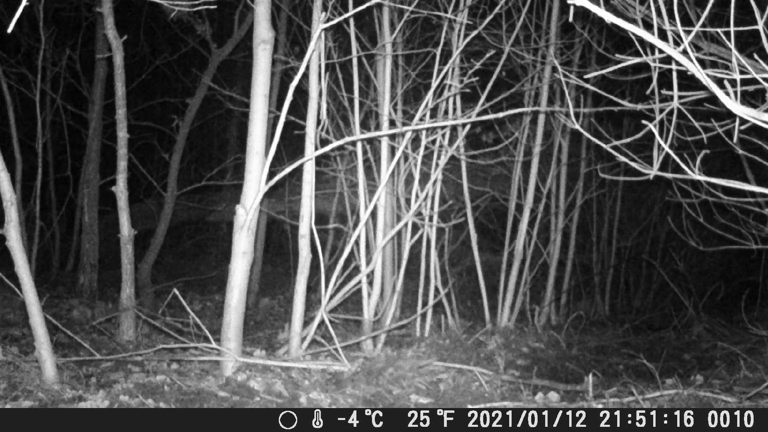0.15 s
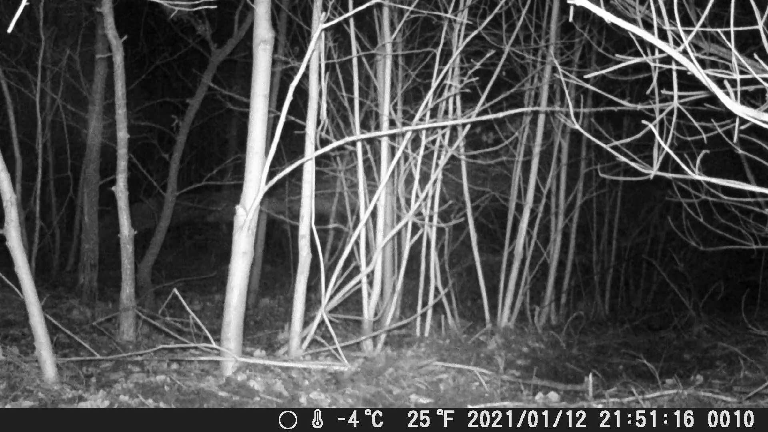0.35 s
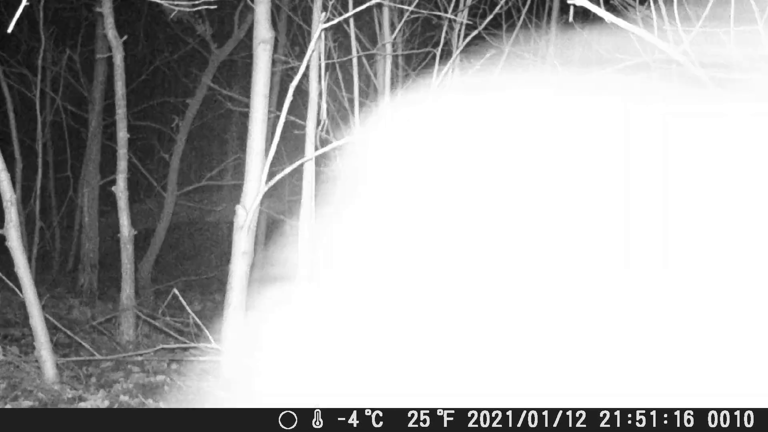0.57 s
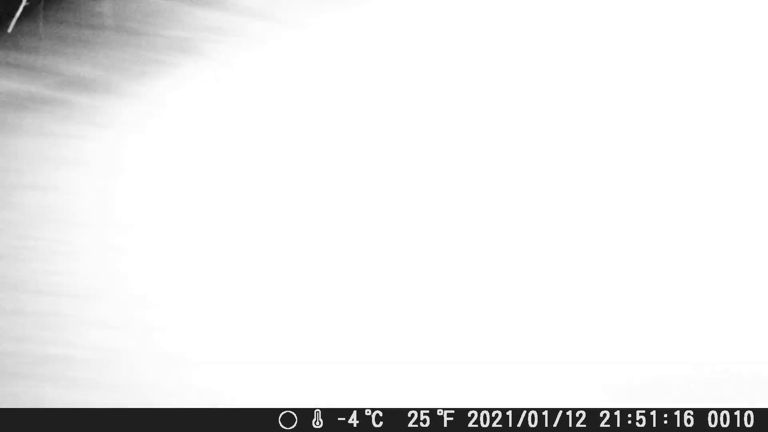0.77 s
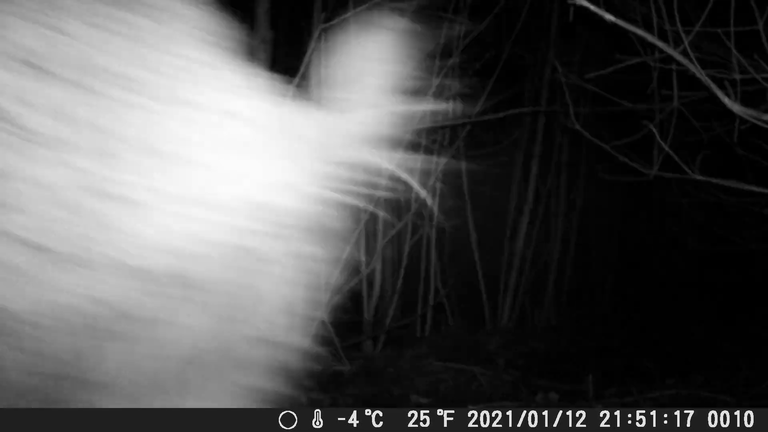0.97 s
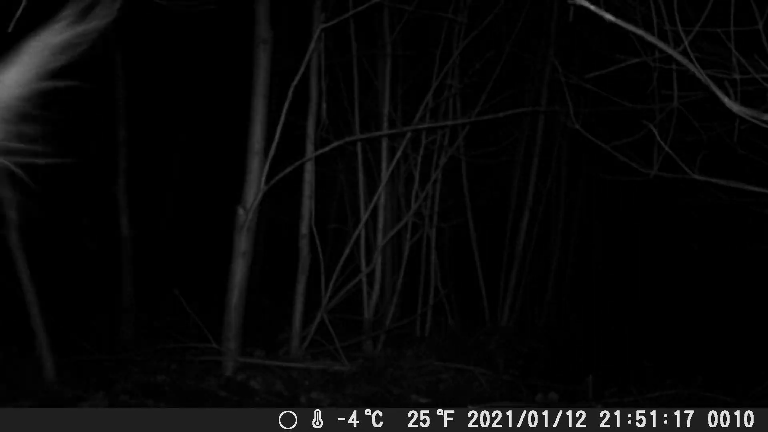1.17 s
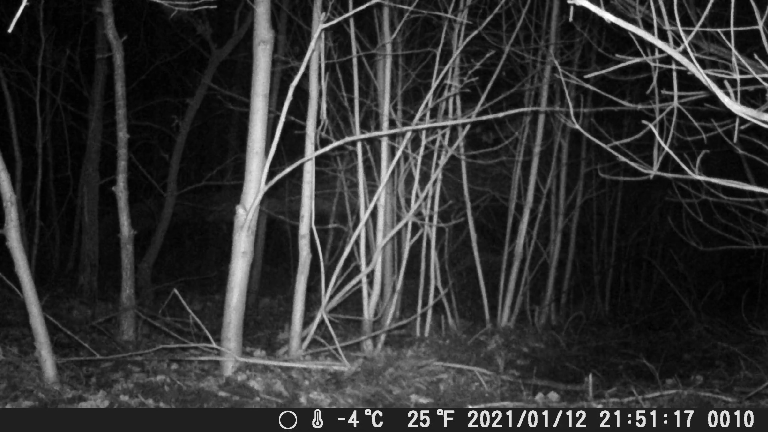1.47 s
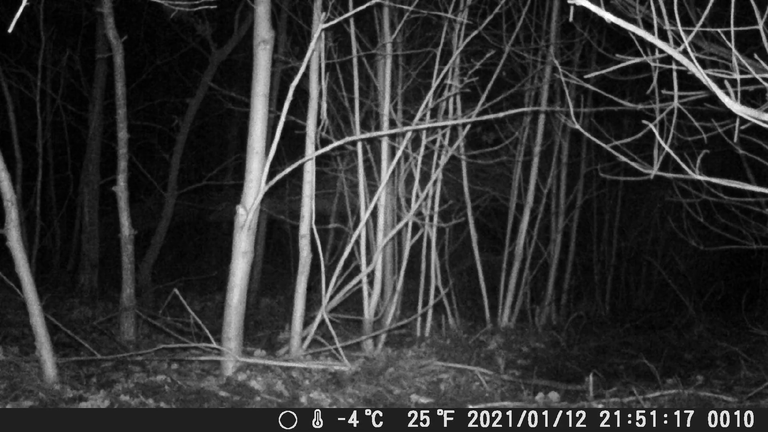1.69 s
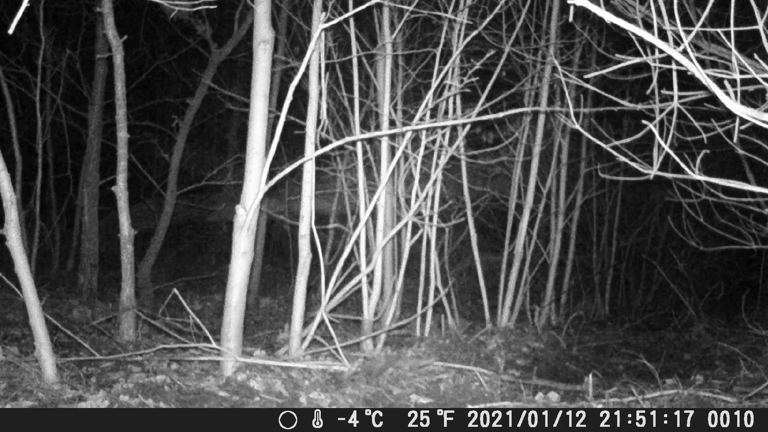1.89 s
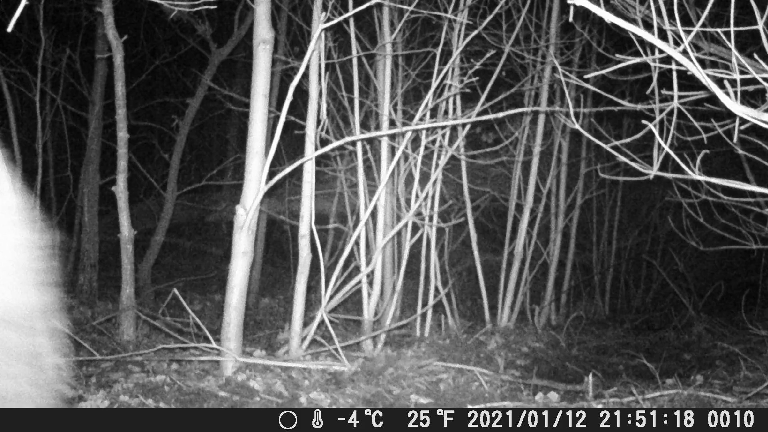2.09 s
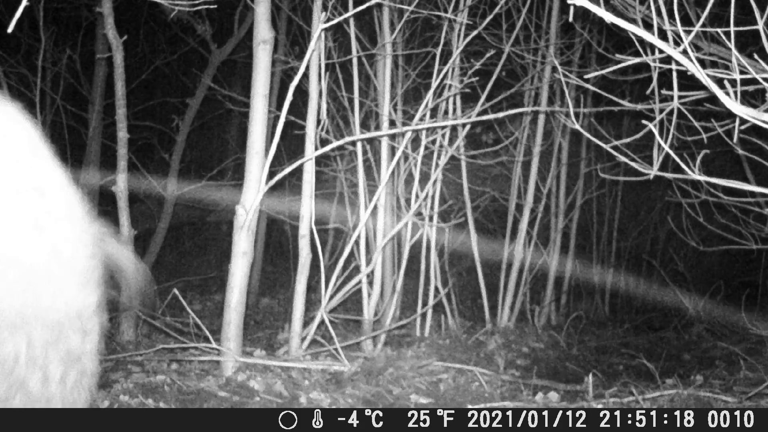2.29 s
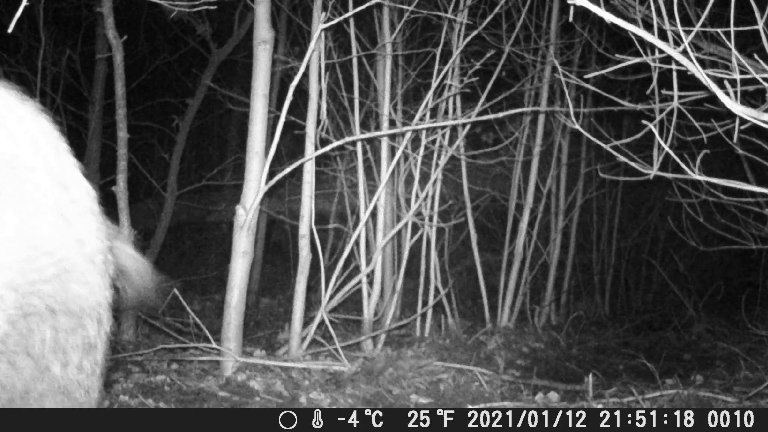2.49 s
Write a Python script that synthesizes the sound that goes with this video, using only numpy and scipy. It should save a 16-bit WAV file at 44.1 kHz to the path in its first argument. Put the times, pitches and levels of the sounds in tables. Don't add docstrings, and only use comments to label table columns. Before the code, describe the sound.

Short throaty boar grunt, then a puffing snort, amid hooves crunching frosty leaves and snapping twigs

```python
import sys
import numpy as np
from scipy import signal
from scipy.fft import rfft, irfft
from scipy.io import wavfile
from scipy.ndimage import uniform_filter1d

SR = 44100
rng = np.random.default_rng(int(sys.argv[2]) if len(sys.argv) > 2 else 0)


def nominal_scale(level):
    x = np.asarray(level, float) / 20
    return 10 ** x


def master(y):
    cut = np.clip(np.atleast_2d(y).T, -1, 1)
    pcm = np.round(cut * 32767)
    wavfile.write(sys.argv[1], SR, pcm.astype(np.int16))


N = 116865
TIME_S = np.arange(N) / SR


def rms_one(x):
    return x / np.sqrt(np.mean(x ** 2) + 1e-20)


def in_time(rows):
    s, *columns = np.transpose(rows)
    return [np.interp(TIME_S, s, c) for c in columns]


def drift(rate_hz):
    r = np.exp(-2 * np.pi * rate_hz / SR)
    noise = rng.standard_normal(N + SR)
    return rms_one(signal.lfilter([1], [1, -2 * r, r * r], noise)[SR:])


def colour(x, spectrum):
    hz = np.arange(1, N // 2 + 2) * SR / N
    at_hz, db = np.transpose(spectrum)
    at_hz = np.r_[at_hz[0] / 4, at_hz, at_hz[-1] * 1.1]
    db = np.r_[db[0] - 30, db, db[-1] - 40]
    gain = nominal_scale(np.interp(np.log(hz), np.log(at_hz), db))
    return rms_one(irfft(rfft(x) * gain, N))


def band(x, order, low_hz, high_hz):
    return signal.sosfilt(signal.butter(order, [low_hz, high_hz], "band", fs=SR, output="sos"), x)


def lowpass(x, order, hz):
    return signal.sosfilt(signal.butter(order, hz, fs=SR, output="sos"), x)


def resonate(x, hz, width_hz):
    r, w = np.exp(-np.pi * width_hz / SR), 2 * np.pi * hz / SR
    return signal.lfilter([0, np.sin(w)], [1, -2 * r * np.cos(w), r * r], x + 1e-18)


def peak(x, hz, width_hz):
    r, w = np.exp(-np.pi * width_hz / SR), 2 * np.pi * hz / SR
    return signal.lfilter([(1 - r * r) / 2, 0, (r * r - 1) / 2], [1, -2 * r * np.cos(w), r * r], x + 1e-18)


def grains(per_s, spread_db):
    sizes = nominal_scale(spread_db * np.minimum(rng.exponential(1, N), 4)) * rng.choice([-1, 1], N)
    clicks = sizes * (rng.random(N) < per_s / SR)
    return rms_one(clicks) + 0.45 * rng.standard_normal(N)


# time in seconds, fold pulse rate in Hz, level in dB, mouth opening 0-1.
GRUNT = [
    (1.698, 60.93, -31, 0),
    (1.715, 60.76, -48, 0.18),
    (1.721, 62.8, -23, 0),
    (1.762, 68.64, -19.5, 0.18),
    (1.78, 72.35, -26.5, 0.37),
    (1.811, 94.36, -29.5, 0.8),
    (1.817, 73.18, -25, 1),
    (1.888, 71.8, -25, 0.83),
    (1.901, 66, -34, 0.6),
]


def fold_cycles():
    rate_hz = in_time(GRUNT)[0]
    on = (TIME_S > GRUNT[0][0]) & (TIME_S < GRUNT[-1][0])
    return 0.5 + np.cumsum(rate_hz * on) / SR, on


# pitch in Hz, width in Hz, level in dB with mouth shut, half open, open.
THROAT = [(94.6, 98, -6, -5.5, -5), (186, 90, -8, -4, -7), (302, 132, -0.5, 2.5, -8),
          (431, 74, -14.5, -10.5, -12), (568, 130, -22, 7.5, -12), (679, 110, -4.5, -56, -8),
          (886, 107, -27, -46, 5.5), (998, 103, -22.5, 6.5, -27), (1121, 107, -15, -49, 1.5),
          (1744, 193, -34, -8.5, -8.5), (2333, 340, -46.5, -11.5, -3.5), (2470, 68, -45, -15, -15.5),
          (3750, 330, -46, -50, -27)]
# pitch in Hz, width in Hz.
NOTCHES = [(1400, 190), (2010, 74)]
# time in seconds, lift in dB.
SNOUT = [(1.78, -2.5), (1.797, 0.5), (1.81, 4), (1.822, -6.5), (1.846, 0.5), (1.86, 0), (1.872, 3),
         (1.886, -5.5), (1.9, 12)]


def grunt():
    jitter_cycles, shimmer_db, rough, scatter_s = 0.012, 1.4, 0.28, 0.0006
    rate_hz, level_db, mouth = in_time(GRUNT)
    push_db, = in_time(SNOUT)
    cycles, on = fold_cycles()
    at = np.flatnonzero(np.diff(np.floor(cycles)))
    timing = rng.standard_normal(len(at))
    at = at + (timing * jitter_cycles * SR / rate_hz[at]).astype(int)
    puff = rough * 0.2 * rng.standard_normal(N) * np.exp(-2.6 * (cycles % 1))
    voice = np.zeros(N)
    for hz, width_hz, *mouth_db in THROAT:
        late = (scatter_s * rng.standard_normal(len(at)) * SR).astype(int)
        drive = puff.copy()
        drive[at + late] -= nominal_scale(shimmer_db * rng.standard_normal(len(at)))
        drive_db = level_db + (hz > 1500) * push_db + np.interp(mouth, [0, 0.5, 1], mouth_db)
        drive = drive * on * nominal_scale(drive_db)
        voice += peak(resonate(drive, hz, width_hz), hz, width_hz)
    for hz, width_hz in NOTCHES:
        voice = voice - 0.8 * peak(voice, hz, width_hz)
    shut = 1 / (1 + np.exp(np.clip((TIME_S - GRUNT[-1][0]) / 0.0019, -50, 50)))
    return nominal_scale(9.5) * voice * shut


# time in seconds, level in dB.
NOSE = [
    (1.69, -75.5),
    (1.712, -44.5),
    (1.74, -46),
    (1.762, -61),
    (1.81, -46.5),
    (1.832, -66.5),
    (1.858, -56.5),
    (1.895, -75.5),
]


def nose_breath():
    rasp_db, pulsing_db = -7.5, 2
    nose_db, = in_time(NOSE)
    mouth = in_time(GRUNT)[2]
    cycles, _ = fold_cycles()
    nose = rms_one(band(grains(2200, spread_db=1.3), 3, 5600, 7900))
    rasp = rms_one(band(grains(3400, spread_db=1.5), 2, 1700, 5400))
    level = nominal_scale(nose_db - pulsing_db * mouth * (cycles % 1))
    return (np.abs(TIME_S - 1.8) < 0.12) * level * (nose + nominal_scale(rasp_db) * rasp)


# time in seconds, level in dB.
SNORT = [
    (1.965, -59),
    (1.99, -39.5),
    (2.018, -35),
    (2.045, -40),
    (2.075, -44),
    (2.105, -61.5),
    (2.125, -56.5),
    (2.2, -57.5),
]
# frequency in Hz, density in dB per Hz.
SNORT_COLOUR = [(76, -45.5), (130, -6.5), (362, -6), (409, -3.5), (524, -9.5), (1140, -7), (3900, -28.5),
                (4800, -36), (6870, -25), (8800, -40.5), (11400, -78), (19400, -120)]


def snort():
    start, end = (SNORT[0][0] - 0.01, -90), (SNORT[-1][0] + 0.014, -90)
    db, = in_time([start] + list(SNORT) + [end])
    return nominal_scale(db + 1.5 * drift(70)) * colour(grains(3500, spread_db=2.5), SNORT_COLOUR)


# start in seconds, length in seconds, level in
# dB, first Hz, last Hz.
WHISTLES = [(0.584, 0.0704, -61, 1343, 1600), (1.11, 0.048, -64, 1460, 2000),
            (1.135, 0.043, -57.5, 949, 602), (1.165, .03, -67, 1910, 1320), (1.63, .05, -70, 488, 417),
            (1.697, .025, -40.5, 232, 293), (1.706, 0.051, -52.5, 1950, 1880),
            (1.765, 0.051, -40, 965, 1027), (1.815, 0.05, -64.5, 4400, 4060),
            (1.84, 0.073, -58, 3970, 3670), (1.843, 0.028, -56.5, 5870, 5880),
            (1.845, 0.014, -33, 912, 870), (1.849, .045, -65, 4980, 4940), (1.878, 0.028, -34, 928, 834),
            (1.885, 0.013, -54, 3850, 3840), (1.99, 0.0443, -54, 807, 1293), (2.0, 0.05, -59.5, 3800, 3782),
            (2.025, 0.032, -57, 2095, 2520), (2.06, 0.031, -52, 2470, 2640), (2.08, .035, -50, 2143, 2310),
            (2.1, 0.054, -52.5, 266.3, 205)]


def whistles():
    out = np.zeros(N)
    for s, length_s, db, first_hz, last_hz in WHISTLES:
        slow = lowpass(rng.standard_normal((2, SR // 8)), 2, 140)[:, 1000:]
        u = np.clip(np.arange(slow.shape[1]) / (length_s * SR), 0, 1)
        turn = 2 * np.pi * np.cumsum(first_hz + (last_hz - first_hz) * u) / SR
        wave = rms_one(slow[0] * np.cos(turn) + slow[1] * np.sin(turn))
        out[int(s * SR):][:len(u)] += nominal_scale(db) * np.sin(np.pi * u ** 0.73) * wave
    return out


# start in seconds, length in seconds, level in dB, brightness in dB,
# share of the length spent swelling.
RUSTLES = [(-.02, 0.032, -47, 0.9, 0.033), (0.02, .11, -51, -1.5, 1), (0.123, 0.086, -55.5, 2.5, 0.61),
           (.231, 0.005, -53, 3.5, 0.032), (0.284, 0.077, -58.5, -1.5, 0.25),
           (0.387, 0.022, -51.5, 2.5, 0.16), (0.431, 0.019, -72.5, 6.5, 0.23), (0.498, 0.15, -59.5, 3.5, 1),
           (0.69, 0.062, -70, 1, 0.72), (0.782, 0.015, -60, 0.7, 0.082), (0.829, 0.081, -60, -1.2, 0.19),
           (1.071, 0.059, -56, 1, 0.95), (1.106, 0.085, -57.5, -6.5, 0.82),
           (1.34, 0.038, -58.5, -1.5, 0.63), (1.403, 0.081, -70, 3.5, 0.23), (1.481, 0.1, -60, 4.5, 1),
           (1.891, 0.059, -55, 4, 1), (2.073, 0.046, -46.5, -1.5, 0.17), (2.126, 0.041, -65, 4, 0.59),
           (2.179, 0.059, -57.5, 3.5, 0.45), (2.272, 0.038, -53, 1, 0.76), (2.332, 0.034, -60, 4, 0.94),
           (2.363, 0.12, -55, -0.45, 0.28), (2.527, 0.019, -52, -1.3, 0.69),
           (2.568, 0.052, -59.5, 0.5, 0.31)]
# frequency in Hz, density in dB per Hz.
LEAVES = [(120, -4), (200, 1.5), (756, -5.5), (1700, -7.5), (2560, -11.5), (3250, -13.5), (4900, -23.5),
          (7160, -14.5), (8800, -30), (11400, -74), (19400, -120)]


def leaves():
    crackles_per_s, fall_s = 900, 0.02
    crackle = colour(grains(crackles_per_s, spread_db=1.75), LEAVES)
    low = lowpass(crackle, 1, 2000)
    dull, bright = np.zeros(N), np.zeros(N)
    for s, length_s, db, tilt_db, swell in RUSTLES:
        rise = np.clip((TIME_S - s) / (max(swell, 0.03) * length_s), 0, 1)
        shape = rise * np.exp(-np.maximum(TIME_S - s - length_s, 0) / fall_s)
        dull += shape * nominal_scale(db - tilt_db)
        bright += shape * nominal_scale(db + 2.3 * tilt_db)
    return nominal_scale(1.2 * drift(70)) * (dull * low + bright * (crackle - low))


# time in seconds, peak in dB, pitch in Hz.
SNAPS = [(0.072, -59, 2220), (0.0978, -52, 1880), (0.197, -48, 1270), (0.2329, -49.5, 1600),
         (0.2405, -42, 3000), (0.2563, -50, 2400), (0.287, -54, 2670), (0.321, -59, 1490),
         (0.3636, -51, 1510), (0.395, -42, 1860), (0.3985, -55, 2000), (0.403, -42, 3200),
         (0.4104, -62, 2500), (0.5147, -50, 2630), (0.531, -56, 3100), (0.558, -60, 1410),
         (0.648, -50, 1600), (0.7843, -60, 1940), (0.843, -44, 1720), (1.1134, -65, 1230),
         (1.18, -56, 3530), (1.3647, -54, 1610), (1.4293, -59, 1300), (1.9467, -39, 2240),
         (2.2897, -47, 3320), (2.302, -65, 2390), (2.363, -45.5, 2730), (2.4216, -49, 1390),
         (2.543, -49, 2170)]
# time in seconds, peak in dB, pitch in Hz.
TICKS = [(0.199, -38.5, 7060), (0.165, -46, 6900), (0.235, -38, 6900), (0.2544, -44.5, 5800),
         (0.3282, -49.5, 6610), (0.3346, -58.5, 6530), (0.471, -53, 6200), (0.513, -44, 6300),
         (0.6614, -51.5, 4900), (0.676, -51, 6600), (0.7868, -48, 6750), (0.8879, -55, 6690),
         (0.962, -57.5, 6740), (0.9947, -56, 7200), (1.0169, -52.5, 6600), (1.055, -66, 5000),
         (1.308, -66.5, 5600), (1.372, -59, 5660), (1.908, -43, 6000), (1.9268, -43, 6940),
         (1.9777, -40.5, 6740), (2.4644, -50.5, 6250)]


def twigs():
    gain_db, ring_cycles, crack, crack_s = 5, 17, 0.24, 0.0015
    out, t = np.zeros(N + SR), np.arange(SR // 10) / SR
    for s, db, hz in list(SNAPS) + list(TICKS):
        ring = np.sin(2 * np.pi * hz * t) * np.exp(-7 * t * hz / ring_cycles)
        click = crack * rng.standard_normal(len(t)) * np.exp(-t / crack_s)
        out[int(s * SR):][:len(t)] += nominal_scale(db + gain_db) * (ring + click)
    return out[:N]


# time in seconds, peak in dB, pitch in Hz.
THUDS = [(0.234, -27, 84), (0.287, -31, 56), (0.782, -40, 320), (0.882, -29.5, 95), (1.114, -34, 70),
         (1.247, -30.5, 56), (1.445, -33, 49), (1.923, -31, 33.6), (2.04, -28.5, 133), (2.17, -32, 90),
         (2.3, -36, 124), (2.545, -38, 207)]


def hooves():
    out, t = np.zeros(N + SR), np.arange(SR // 10) / SR
    for s, db, hz in THUDS:
        push = np.sin(2 * np.pi * hz * t) * 1.84 * t * hz * np.exp(-1.5 * t * hz)
        out[int(s * SR):][:len(t)] -= nominal_scale(db) * push
    return out[:N]


# frequency in Hz, density in dB per Hz.
RUMBLE = [(8.8, -24), (15, 9), (48, 0.5), (64, -1.5), (97, -7.5), (121, -6.5), (162, -14), (400, -28.5),
          (520, -59.5), (880, -120)]
# time in seconds, level in dB.
SHAKE = [(0.0, -46), (0.3, -39), (0.32, -43.5), (1.28, -46), (1.36, -54), (1.45, -43), (1.61, -47.5),
         (1.8, -40.5), (2.03, -41), (2.53, -48), (2.65, -43.5)]


def rumble():
    low = colour(rng.standard_normal(N), RUMBLE)
    power = uniform_filter1d(low ** 2, size=3000)
    return nominal_scale(in_time(SHAKE)[0]) * rms_one(low / (power + 0.1) ** 0.2)


# frequency in Hz, density in dB per Hz.
HISS = [(120, -58), (200, -21.5), (279, -9), (493, -16), (872, -15), (944, -13.5), (5140, -33.5),
        (6110, -30), (8800, -34), (11400, -66.5), (19400, -120)]
# time in seconds, lift in dB.
STIR = [(0, 5), (.9, 1.5), (1.0, 3), (1.2, 7), (1.24, -3), (1.34, 1), (1.38, -1), (1.65, 5.5), (2.15, 8),
        (2.65, 0.5)]


def night_air():
    hiss_db, settle_db, settle_per_s = -67, -70.5, 120
    level_db = hiss_db + in_time(STIR)[0] + 0.8 * drift(8)
    hiss = nominal_scale(level_db) * colour(rng.standard_normal(N), HISS)
    settling = colour(grains(settle_per_s, spread_db=4.6), LEAVES)
    return hiss + nominal_scale(settle_db) * settling


def scene():
    boar = grunt() + nose_breath() + snort() + whistles()
    steps = leaves() + twigs() + hooves()
    return (boar + steps + rumble() + night_air())[None]


def low_pass(x):
    return signal.sosfilt(signal.butter(12, 9030, fs=SR, output="sos"), x)


def record(dry):
    mix = signal.sosfilt(signal.cheby2(10, 60, 9850, fs=SR, output="sos"), dry)
    return low_pass(mix)


dry = scene()
out = record(dry)
master(out)
```